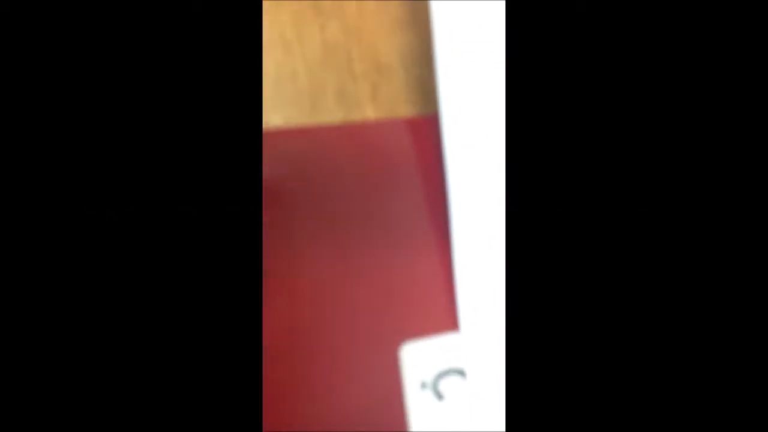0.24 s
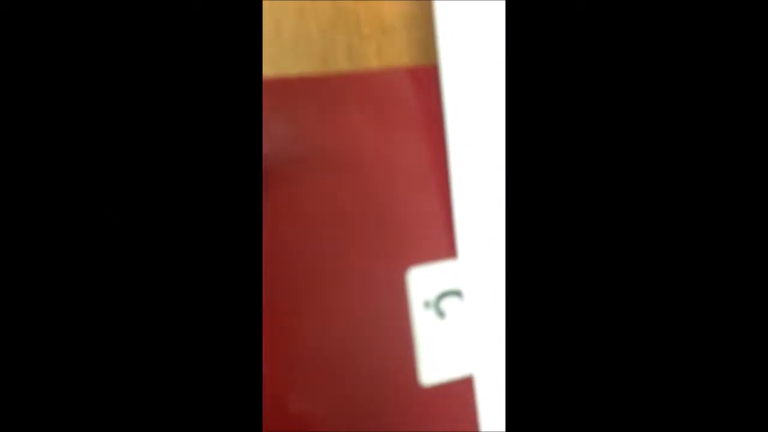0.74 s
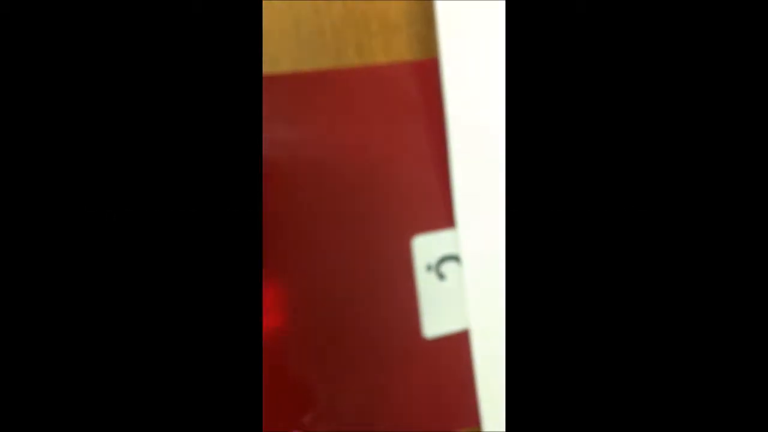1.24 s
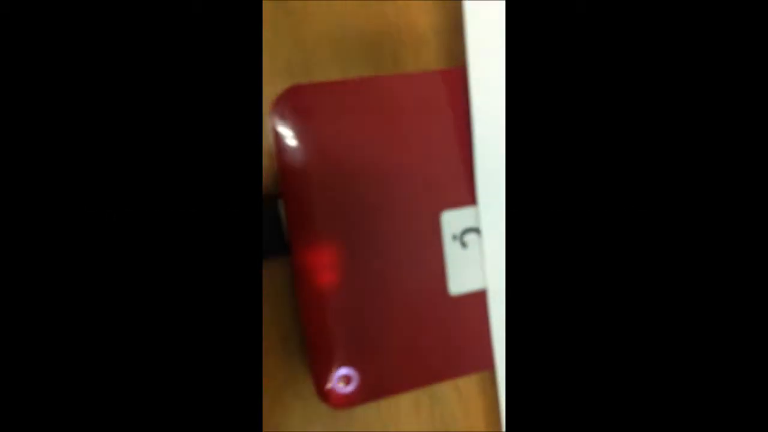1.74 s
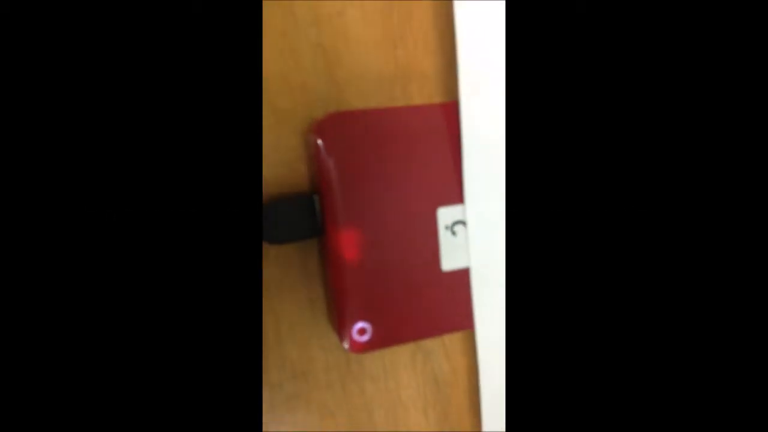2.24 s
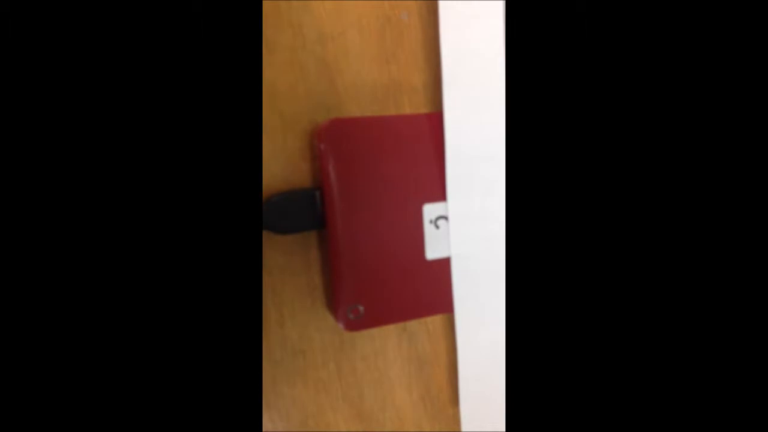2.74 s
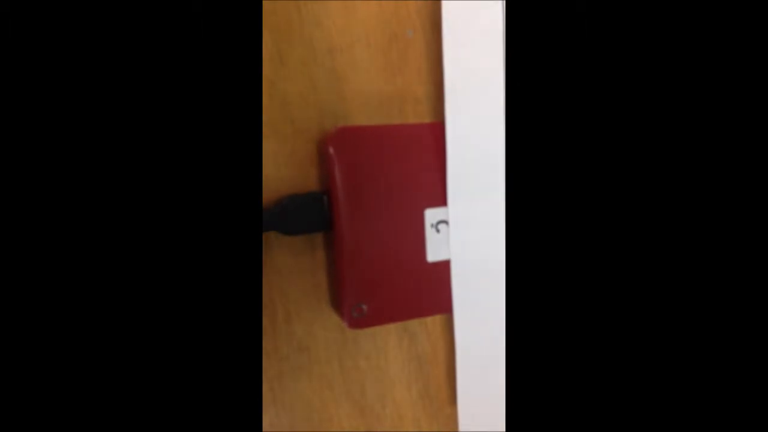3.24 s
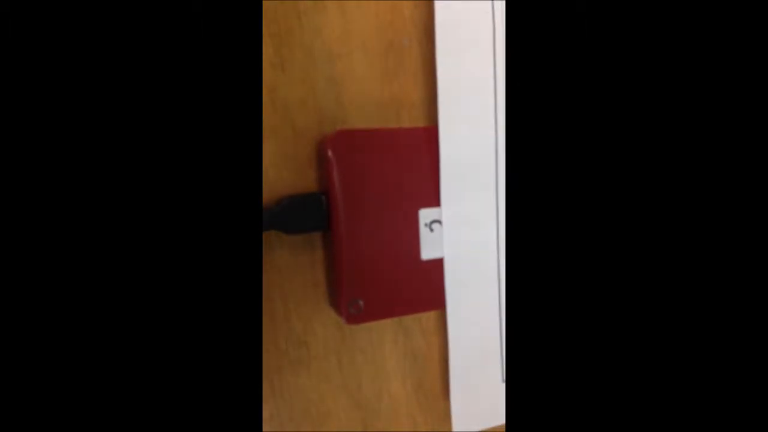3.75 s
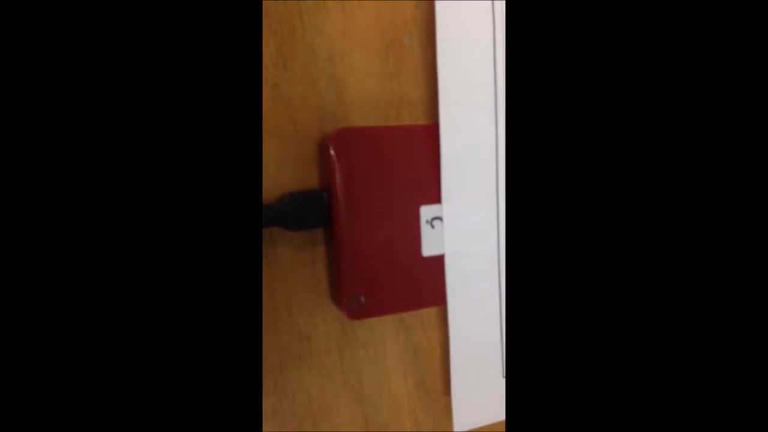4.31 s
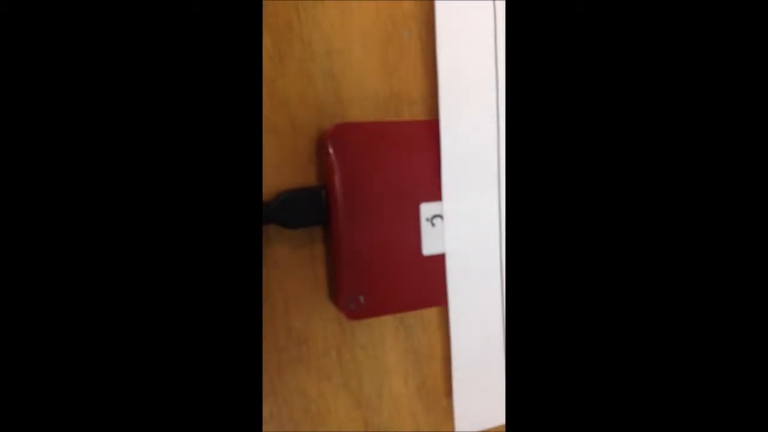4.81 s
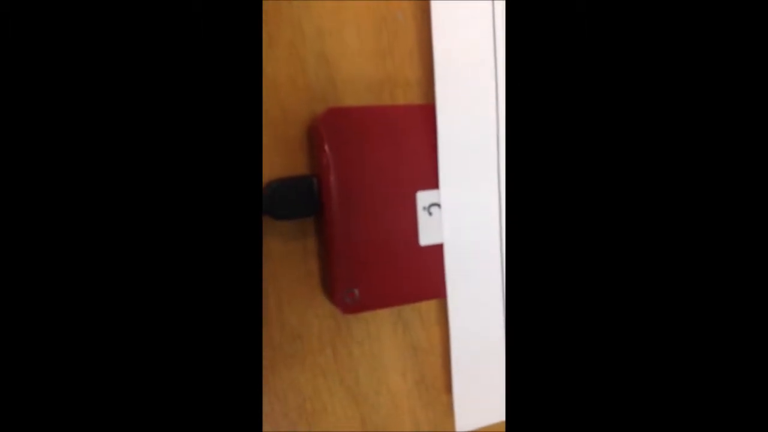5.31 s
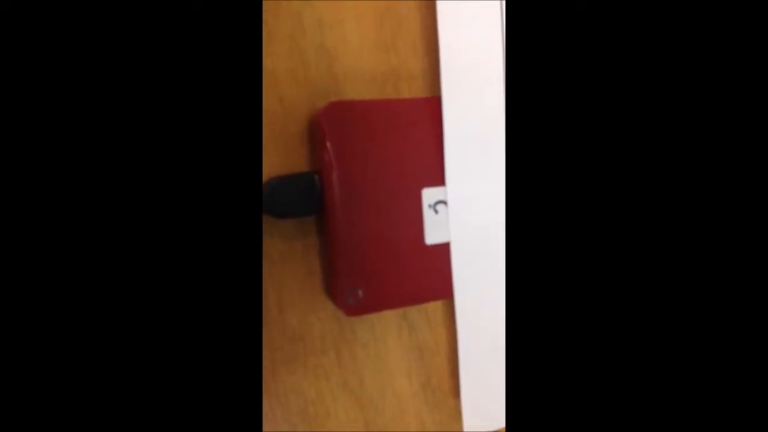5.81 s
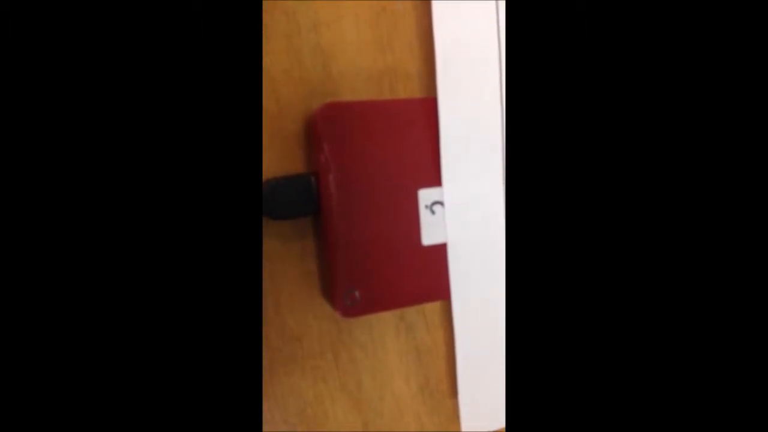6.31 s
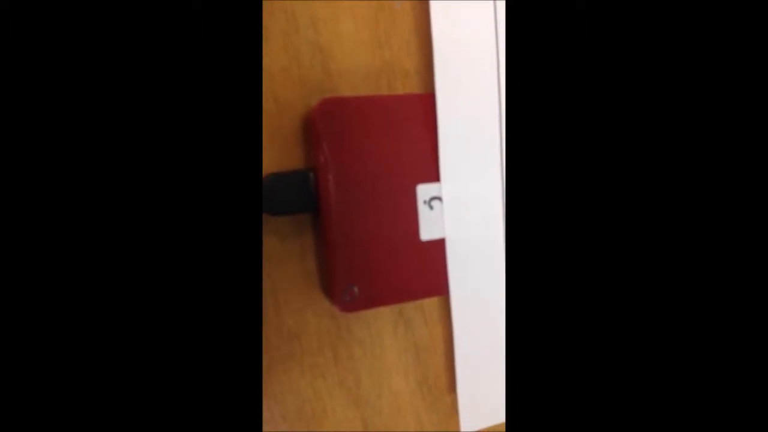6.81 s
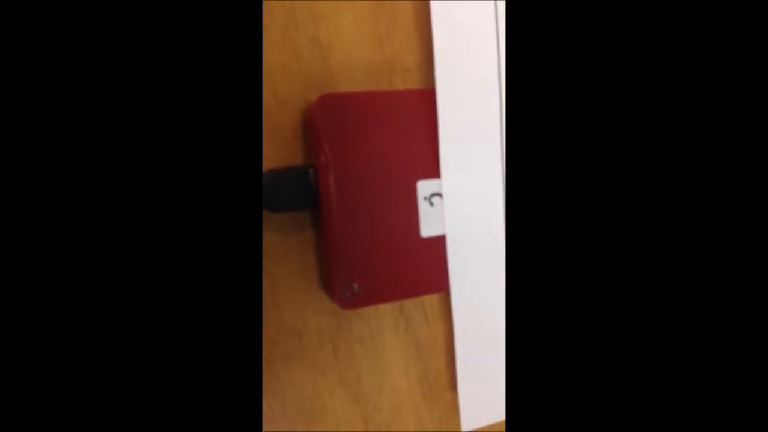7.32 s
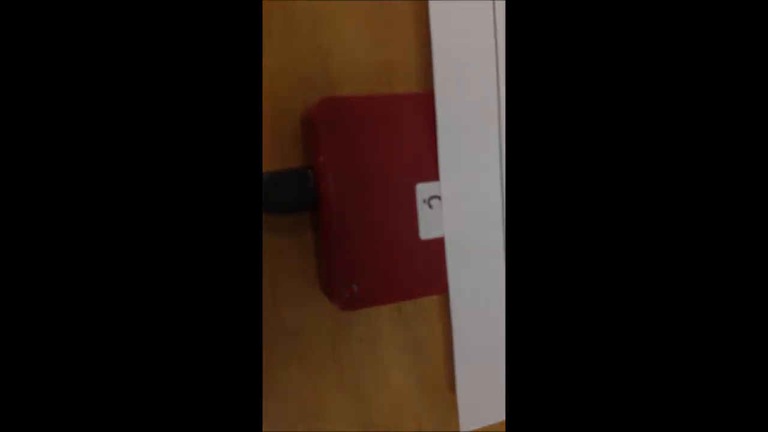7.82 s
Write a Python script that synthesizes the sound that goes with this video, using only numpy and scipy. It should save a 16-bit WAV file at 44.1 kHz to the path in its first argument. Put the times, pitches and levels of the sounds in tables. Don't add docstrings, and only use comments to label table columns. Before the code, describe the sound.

Indoors at a desk, a low, steady fan drone, strongest around 220 Hz, and a soft drive murmur run throughout. At 0.0 seconds a loud, sharp clack bursts from a small hard drive: a tiny latch tick, a hard bright strike, a rebound about 11 ms later, and a faint settling touch, all dry and short with a slight rattle. About 0.2 seconds later a very faint, grainy high whirr lasts roughly a quarter second, with a barely audible ping. The cycle repeats at 0.8, 1.6, 2.4, 3.2, 4.0, 4.8, 5.6, 6.45 and 7.26 seconds, with varying rebounds. Small finger creaks occur near 0.25-0.4; dull grip thuds and creaks near 0.75 and 1.58. The close phone draws back until about 2.6, so later clacks are softer and gradually duller. Thin hiss momentarily drops out, longest near 6.9. Drone continues to the end, about 8 seconds.

```python
import sys
import numpy as np
from scipy import signal
from scipy.fft import rfft, irfft
from scipy.io import wavfile
from scipy.ndimage import uniform_filter1d

SR = 44100
rng = np.random.default_rng(int(sys.argv[2]) if len(sys.argv) > 2 else 0)


def volts_from_decibels(level):
    exponent = np.asarray(level, float) / 20
    return 10 ** exponent


def inscribe(sig):
    pcm = np.round(np.clip(np.atleast_2d(sig).T, -1, 1) * 32767)
    wavfile.write(sys.argv[1], SR, pcm.astype(np.int16))


N = 355401

# (frequency [Hz], level [dB per Hz])
AIR = [(15, -91), (36, -24), (82, -13), (113, -18.5), (140, -5.5), (173, -7.5), (215, 2.5), (305, -15),
       (340, -9), (368, -15.5), (482, -16.5), (848, -24.5), (2630, -31), (3340, -37), (15500, -51)]
# (frequency [Hz], width [Hz], level [dB])
FAN = [(92.3, 14, -73), (150.3, 10.6, -64.5), (219.46, 15.4, -55.5), (338.4, 20, -70.5), (477.2, 23.5, -71),
       (600, 17, -72.5), (748, 61, -74)]
# (frequency [Hz], level [dB per Hz])
MURMUR = [(250, -12), (420, -1.0), (750, -4.5), (1100, -19), (2300, -18), (2750, -41),
          (3050, -17.0), (3600, -20.5), (6000, -43)]
# (time [s], level [dB])
MURMUR_LEVEL = [
    (0.0, -54.5),
    (1.64, -56.5),
    (2.6, -63),
    (8.06, -61.5),
]
# (time [s], peak [dB], centre [Hz], length [s])
CREAKS = [
    (0.24, -67, 3200, 0.023),
    (0.265, -55, 2980, 0.0052),
    (0.272, -56, 2800, 0.01),
    (.281, -56, 4500, .003),
    (0.357, -58, 3000, 0.0079),
    (0.379, -52, 2700, 0.026),
    (0.749, -50, 3500, 0.0023),
    (1.584, -52.5, 1500, 0.005),
    (2.156, -63, 2390, 0.02),
    (3.581, -65, 2500, 0.0055),
]
# (frequency over centre [ratio], level [dB per Hz])
SCRATCH_BAND = [(.3, -22), (.75, 0), (1.5, -4), (3.5, -20)]
# (time [s], peak [dB], frequency [Hz])
THUDS = [
    (.7458, -34, 420),
    (.7485, -40, 300),
    (.7565, -39, 280),
    (1.5855, -38, 480),
    (1.588, -40, 310),
    (.006, -34, 700),
]
# (frequency [Hz], level [dB], t60 [s])
PAWL = [(3915, 0, .02), (4085, -2, .02), (4500, -13, .015), (5900, -16, .015), (6400, -18, .015),
        (1700, -24, .02)]
# (frequency [Hz], level [dB], t60 [s])
CASE = [(772, -14, 0.16), (954, -13, 0.13), (1357, -11.5, 0.074), (1458, -9.5, 0.098), (1506, -30, 0.07),
        (2149, -8.5, 0.046), (3090, -3, 0.1), (3128, 1, 0.061), (3270, 3.5, 0.039), (3330, 0.5, 0.073),
        (3304, -5.5, 0.065), (3710, -30, 0.024), (3820, -7, 0.05), (3990, -6, 0.082), (3990, -8, 0.056),
        (4510, -22, 0.063), (5465, -10, 0.061)]
# (frequency [Hz], level [dB], t60 [s])
ARM = [(5700, -5, .018), (6400, -2, .02), (6800, -5, .015), (7500, -8, .012), (8400, 0, .014),
       (8800, -2, .012), (9500, -2, .012), (10000, -4, .012), (11200, -11, .01), (12000, -9, .01),
       (13200, -11, .01), (14000, -12, .01), (14800, -12, .01)]
# (frequency [Hz], level [dB per Hz])
RATTLE = [(350, -75), (600, -21), (1070, -30.5), (1320, -7), (1810, -24.5), (2080, -11.5), (2600, -35),
          (3150, -2), (4900, -16), (5470, -11), (6030, -25), (14600, -32.5), (16300, -37)]
# (time after push [s], level [dB])
JOLTS = [
    (0, -3.5),
    (.0016, -27),
    (.0032, -17.5),
]
# (frequency [Hz], width [Hz], level [dB])
WHIRR = [(3200, 260, 0), (3380, 200, -0.5), (3950, 470, -0.5), (5200, 270, -6)]
# (frequency [Hz], level [dB], t60 [s])
PING = [
    (5420, 0, .02),
    (5700, -12, .02),
]
# (time [s], peak [dB], rebound loss [dB], settling after [s], settling loss [dB])
BLOWS = [
    (0.0032, -13.5, -6.5, 0.028, -26),
    (0.8100, -13.5, -10, 0.026, -25),
    (1.618, -15, -7.5, 0.022, -26),
    (2.416, -19, -2.5, 0.026, -20),
    (3.2175, -18, -8, .0258, -27),
    (4.0225, -18, -4.5, 0.028, -27),
    (4.8302, -18, -8, .0225, -17.5),
    (5.6386, -17.5, -6, 0.022, -21),
    (6.4516, -18.5, -3, .0320, -23),
    (7.262, -18, -6.5, .0285, -28),
]
HISSLESS_FRAMES = [18, 29, 52, 84, 86, 92, 118, 120, 129, 135, 147, 161, 169, 175, 202, 211, 220, 241, 248,
                   308, 326, 328, 333, 338, 346, 367]
# (centre [s], fade [s], hold [s])
HISSLESS_RUNS = [
    (.058, .012, .006),
    (.7355, .009, .008),
    (1.568, .009, .012),
    (4.876, .012, 0),
    (6.878, .016, .04),
]

AIR_DB, HISS_EDGE_HZ = -52.5, 15350
LATCH_LEAD_S, LATCH_DB = .0085, -17
LATCH_RATTLE_DB, LATCH_RATTLE_T60_S = -11, .04
LONGEST_RING_S = .055
BLOW_BRIGHT_DB, REBOUND_BRIGHT_DB = -13.5, -9.5
SETTLE_BRIGHT_DB = -0.5
REBOUND_S, REBOUND_S_PER_S = .0111, -.0002
DULLING_DB_PER_S = -0.9
RETURN_START_S, RETURN_ATTACK_S, RETURN_HOLD_S, RETURN_RELEASE_S = 0.202, 0.021, 0.19, 0.076
RETURN_SAG_DB, RETURN_DB = -2, -57
PING_AFTER_S, PING_DB = .261, -44
FRAME_S, FIRST_FRAME_S, LONE_FADE_S = 1024 / 48000, .0087, .014


def evened(x):
    return x / np.sqrt(np.mean(x ** 2) + 1e-20)


def add(mix, s, sound):
    part = mix[max(round(s * SR), 0):][:len(sound)]
    part += sound[:len(part)]


def coloured(points, count):
    f, db = np.transpose(points)
    hz = np.fft.rfftfreq(count, 1 / SR)
    shape = volts_from_decibels(np.interp(np.log(hz + 1), np.log(f + 1), db))
    return evened(irfft(rfft(rng.standard_normal(count)) * shape, count))


def resonate(x, hz, width):
    turn = np.exp(2j * np.pi * hz * np.arange(len(x)) / SR)
    r = np.exp(-np.pi * width / SR)
    smooth = signal.lfilter([1], np.convolve([1, -r], [1, -r]), x / turn)
    return (turn * smooth).real


def ring(modes, rise, spread_db, spread_hz):
    t = np.arange(6000)[:, None] / SR
    hz, db, t60 = np.transpose(modes)
    level_shift, pitch_shift, phase = rng.standard_normal((len(hz), 3)).T
    decay = volts_from_decibels(db + spread_db * level_shift - 60 * t / np.minimum(t60, LONGEST_RING_S))
    waves = decay * np.sin(2 * np.pi * (hz + spread_hz * pitch_shift) * t + phase / 4)
    out = waves.sum(1) * (1 - np.exp(-t[:, 0] / abs(rise)))
    return out / abs(out).max()


def room_air():
    hiss_edge = [(HISS_EDGE_HZ, AIR[-2][1]), (HISS_EDGE_HZ + 60, -80)]
    air = volts_from_decibels(AIR_DB) * coloured(AIR[:-2] + hiss_edge, N)
    fan = sum(volts_from_decibels(db) * evened(resonate(rng.standard_normal(N), hz, w)) for hz, w, db in FAN)
    s, db = np.transpose(MURMUR_LEVEL)
    nearness = volts_from_decibels(np.interp(np.arange(N) / SR, s, db) - 6)
    return air + fan + nearness * coloured(MURMUR, N)


def fingers():
    out, t = np.zeros(N), np.arange(3000) / SR
    for s, db, hz, length in CREAKS:
        scratch = coloured([(ratio * hz, level) for ratio, level in SCRATCH_BAND], 3000)
        envelope = np.clip((length - t) / 0.003 + 1, 0, 1) * np.minimum(t / .0008, 1)
        add(out, s, volts_from_decibels(db) * scratch * envelope)
    for s, db, hz in THUDS:
        add(out, s, volts_from_decibels(db - 60 * t / 0.018) * np.sin(2 * np.pi * hz * t))
    return out


def latch(peak_db):
    t = np.arange(6000) / SR
    shake = volts_from_decibels(LATCH_RATTLE_DB - 60 * t / LATCH_RATTLE_T60_S) * np.minimum(t / 0.00097, 1)
    return volts_from_decibels(peak_db) * (ring(PAWL, .001, 1.2, 18) + shake * coloured(RATTLE, 6000))


def return_whirr():
    count = SR // 2
    corners = np.cumsum([RETURN_START_S, RETURN_ATTACK_S, RETURN_HOLD_S, RETURN_RELEASE_S])
    stroke = volts_from_decibels(np.interp(np.arange(count) / SR, corners, [-30, 0, RETURN_SAG_DB, -30]))
    unsteady_db = 3.5 * evened(uniform_filter1d(rng.standard_normal(count), 400))
    grit = rng.standard_normal(count) * volts_from_decibels(unsteady_db)
    return stroke * sum(volts_from_decibels(db) * evened(resonate(grit, hz, w)) for hz, w, db in WHIRR)


def contact(peak_db, bright_db, push_s):
    t, out = np.arange(6000) / SR, np.zeros(6000)
    case = ring(CASE, .0003, 1.2, 6)
    add(out, 0, volts_from_decibels(bright_db + 3) * ring(ARM, 0.00033, 2.6, 106))
    for late, db in JOLTS:
        add(out, push_s + late, volts_from_decibels(db) * case)
        add(out, push_s + late, volts_from_decibels(db + bright_db - 10.0) * ring(ARM, 0.00097, 1.5, 190))
    struck = rng.random(6000) < 700 / SR
    knocks = rng.standard_normal(6000) * struck * volts_from_decibels(-15 - 60 * t / .07)
    out += signal.oaconvolve(knocks, case)[:6000]
    crack = volts_from_decibels(-17.5) / (1 + (t / 0.0059) ** 6) + volts_from_decibels(-18.5 - 60 * t / 0.11)
    out += coloured(RATTLE, 6000) * crack * np.minimum(t / 0.0013, 1)
    return volts_from_decibels(peak_db) * out


def head_arm():
    out = np.zeros(N)
    for s, db, rebound_db, settle_s, settle_db in BLOWS:
        dull_db = DULLING_DB_PER_S * s
        rebound_s = REBOUND_S + REBOUND_S_PER_S * s
        add(out, s - LATCH_LEAD_S, latch(db + LATCH_DB))
        add(out, s, contact(db, BLOW_BRIGHT_DB + dull_db, 0.001493))
        add(out, s + rebound_s, contact(db + rebound_db, REBOUND_BRIGHT_DB + dull_db, 0.00118))
        add(out, s + settle_s, contact(db + settle_db, SETTLE_BRIGHT_DB + dull_db, 0.00032))
        add(out, s + PING_AFTER_S, volts_from_decibels(db + PING_DB) * ring(PING, .001, 1, 40))
        add(out, s, volts_from_decibels(db + RETURN_DB) * return_whirr())
    return out


def scene():
    return (room_air() + fingers() + head_arm())[None]


def roll_off(x):
    return signal.sosfilt(signal.butter(12, 16490, fs=SR, output="sos"), x)


def record(dry):
    edge_hz = [0, HISS_EDGE_HZ, HISS_EDGE_HZ + 150, 16300, 16450, SR / 2]
    edge = signal.firwin2(801, edge_hz, [1, 1, .1, .05, 0, 0], fs=SR)
    full = signal.oaconvolve(dry[0], edge, "same")
    out = full.copy()
    lone = [(FIRST_FRAME_S + k * FRAME_S, LONE_FADE_S, 0) for k in HISSLESS_FRAMES]
    for s, fade, hold in lone + HISSLESS_RUNS:
        half = round((fade + hold / 2) * SR)
        at = slice(round(s * SR) - half, round(s * SR) + half)
        window = signal.windows.tukey(2 * half, min(fade * SR / half, 1))
        bins = rfft(full[at] * window)
        hz = np.fft.rfftfreq(2 * half, 1 / SR)
        typical = np.sqrt(uniform_filter1d(abs(bins) ** 2, size=41))
        threshold = typical * volts_from_decibels(np.interp(hz, [2000, 4000, 7000], [1.8, 3.8, 6.2]))
        lost = min(.9 + 40 * hold, 1)
        change = np.where(abs(bins) < threshold, -lost, .6)
        change = change * (hz > 1200) * (hz < 14900)
        out[at] += irfft(bins * change, 2 * half)
    return roll_off(out[None])


dry = scene()
out = record(dry)
inscribe(out)
```